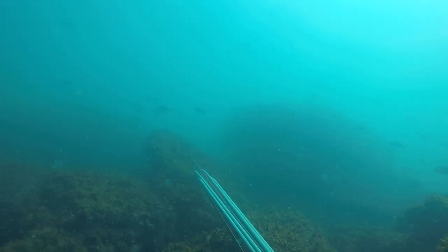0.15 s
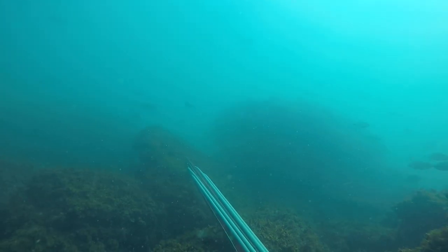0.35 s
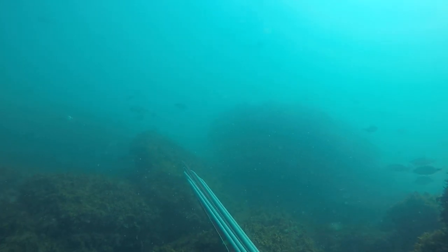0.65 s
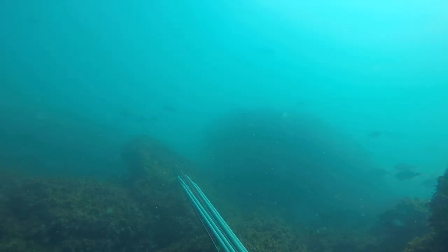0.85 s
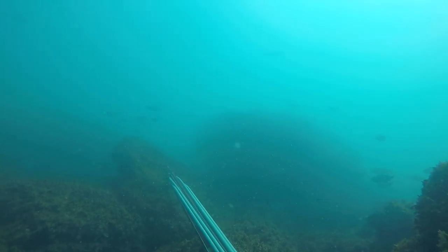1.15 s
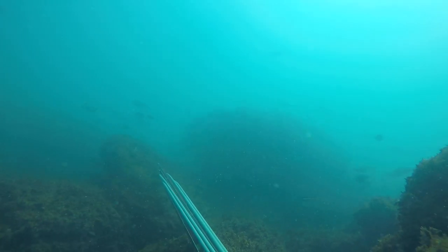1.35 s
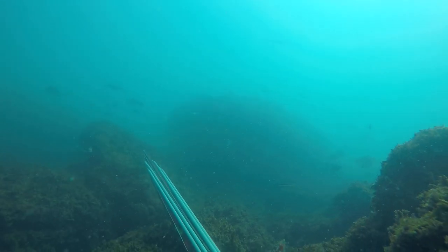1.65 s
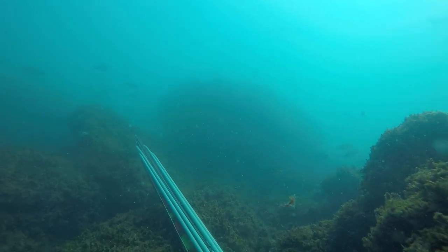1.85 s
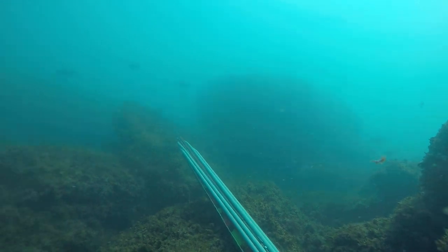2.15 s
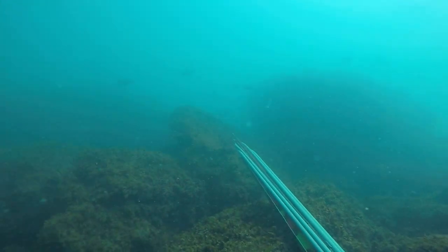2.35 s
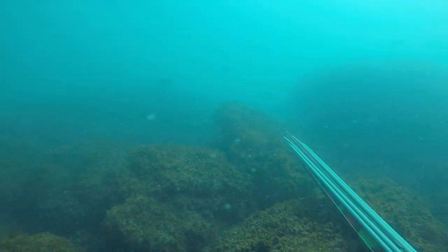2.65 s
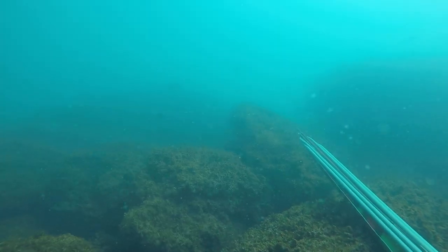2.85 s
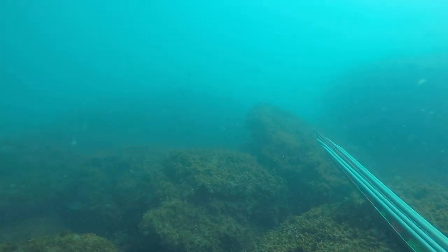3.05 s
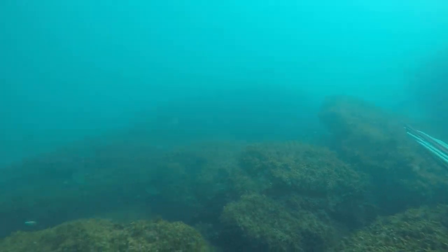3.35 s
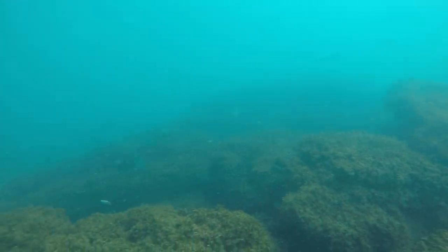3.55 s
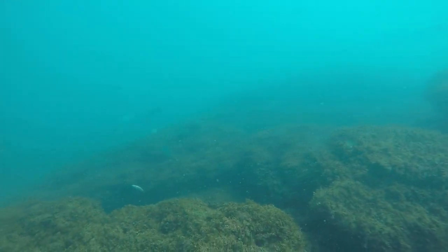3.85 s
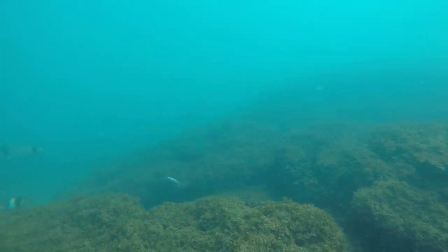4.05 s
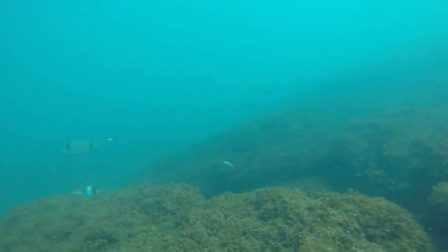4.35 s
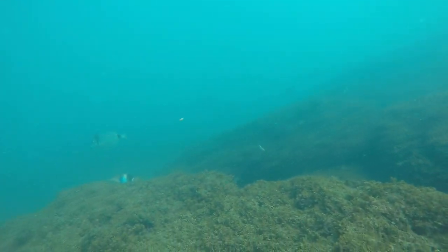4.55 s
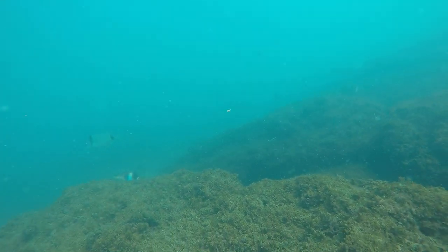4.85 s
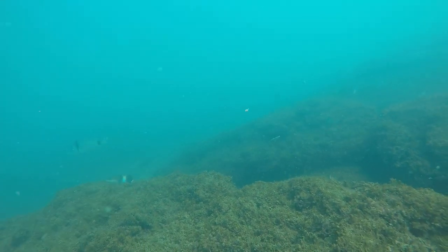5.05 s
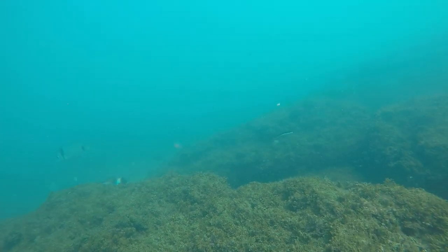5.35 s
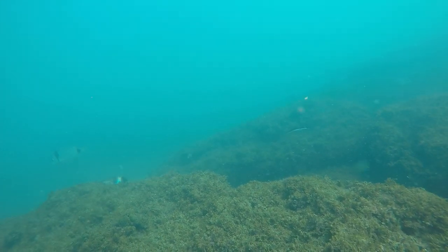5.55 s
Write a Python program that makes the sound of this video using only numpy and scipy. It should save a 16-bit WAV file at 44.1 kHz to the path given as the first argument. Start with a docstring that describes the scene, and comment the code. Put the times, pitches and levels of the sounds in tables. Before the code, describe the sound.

Dense underwater crackling like frying, a few sharp loud snaps, and muffled bumps of a grip against an underwater camera casing.

```python
"""Snapping shrimp crackle all around a camera in a waterproof housing that glides over a rocky reef.
Each snap is a pressure pulse that rings the housing, returns inverted from the sea surface and scatters
off the rocks. Near claws are placed one by one; random clicks, pops, ticks and a fizz make up the colony.
The grip knocks on the housing as damped sines with a few noise scuffs.
Water flowing past rumbles, and the grip rustles faintly, both as coloured noise."""
import sys
import numpy as np
from scipy import signal
from scipy.fft import rfft, irfft, next_fast_len
from scipy.io import wavfile
from scipy.ndimage import map_coordinates

SR = 44100
rng = np.random.default_rng(int(sys.argv[2]) if len(sys.argv) > 2 else 0)


def store_pcm(level_fs):
    """Save levels as 16-bit WAV."""
    pcm = np.round(np.clip(level_fs, -1, 1) * 32767).astype(np.int16)
    wavfile.write(sys.argv[1], SR, np.atleast_2d(pcm).T)


N = 251811
SNAP_SAMPLES, SWELL_SAMPLES = 4096, 128


def amp(db):
    """Decibels to gain."""
    return 10 ** (np.asarray(db) / 20)


def unit(x):
    """Scale to rms 1."""
    return x / np.sqrt(np.mean(x ** 2) + 1e-20)


def along(points, hz):
    """Read (frequency, value) points on a log-frequency axis."""
    point_hz, value = np.transpose(points)
    return np.interp(np.log(hz + 1), np.log(point_hz + 1), value)


def curves(rows):
    """One value per sample for each column after the time."""
    time_s, *columns = np.transpose(rows)
    t = np.arange(N) / SR
    return [np.interp(t, time_s, column) for column in columns]


def wobble(knots_per_s):
    """Smooth random curve: a spline through normal random knots."""
    knots = rng.standard_normal(int(N * knots_per_s / SR) + 4)
    return map_coordinates(knots, [np.arange(N) * knots_per_s / SR])


def filtered(x, response):
    """Zero-phase filter: the spectrum of x times a gain of frequency."""
    size = next_fast_len(N + SR // 2)
    gain = response(np.fft.rfftfreq(size, 1 / SR))
    return irfft(rfft(x, size) * gain, size)[:N]


def noise(spectrum):
    """Coloured noise of rms 1."""
    white = rng.standard_normal(N)
    return unit(filtered(white, lambda hz: amp(along(spectrum, hz))))


def add(track, time_s, sound):
    """Mix a sound into the track."""
    start = int(np.clip(round(time_s * SR), 0, N))
    track[start:start + len(sound)] += sound[:N - start]


# wall resonances and the cancellations between them: (frequency [Hz], half width [Hz], gain [dB])
WALL_MODES = [(975, 210, 2), (1188, 24, -5.5), (2220, 360, 1.5), (3010, 62, -7), (3420, 370, 1),
              (4150, 77, -3.5), (4340, 710, 4.5), (9030, 1100, 3.5), (10810, 140, -8.5)]


def ring(spectrum, focus_hz=3000, focus_db=0, peak_db=0, treble_db=0, wall=1, focus_octaves=0.58,
         peak_octaves=0.093, bending_s=0.001207):
    """Causal answer of the housing to one pressure pulse, chirped by bending waves; energy 1."""
    hz = np.fft.rfftfreq(SNAP_SAMPLES, 1 / SR) + 1
    db = along(spectrum, hz)
    db += wall * sum(gain / (1 + ((hz - mode_hz) / width) ** 2) for mode_hz, width, gain in WALL_MODES)
    octaves = np.log2(hz / focus_hz)
    db += focus_db / (1 + (octaves / focus_octaves) ** 2)
    db += peak_db / (1 + (octaves / peak_octaves) ** 2)
    db += treble_db / (1 + (6500 / hz) ** 6)  # shelf above 6.5 kHz
    # folded cepstrum: minimum phase
    cepstrum = irfft(np.log(np.maximum(amp(db), 1e-6)))
    cepstrum[1:SNAP_SAMPLES // 2] *= 2
    cepstrum[SNAP_SAMPLES // 2 + 1:] = 0
    # bending waves are slower at low pitch: delay = bending_s * (sqrt(1000 / hz) - 0.2)
    phase_lag = 4 * np.pi * bending_s * (np.sqrt(1000 * hz) - hz / 10)
    pulse = irfft(np.exp(rfft(cepstrum) - 1j * phase_lag))
    return pulse / np.linalg.norm(pulse)


def snap(colour, echo_db, scatter_db, crevice_db=-5, crevice_t60_s=0.0085, surface_s=0.0059,
         scatter_t60_s=0.1, swell_db=-15):
    """Short faint noise swell, then a bubble collapse: direct, off crevice and reef, inverted off surface."""
    t = np.arange(SNAP_SAMPLES) / SR
    crevice = rng.standard_normal(SNAP_SAMPLES) * amp(-60 * t / crevice_t60_s)
    reef = rng.standard_normal(SNAP_SAMPLES) * amp(-60 * t / scatter_t60_s)
    paths = amp(crevice_db) * crevice / np.linalg.norm(crevice)
    paths += amp(scatter_db) * reef / np.linalg.norm(reef)
    paths[0] = 1  # direct
    echo_s = surface_s * np.exp(0.07 * rng.standard_normal())
    paths[int(echo_s * SR)] -= amp(echo_db)
    # noise swells for 128 samples up to the snap
    swell = rng.standard_normal(SWELL_SAMPLES) * np.linspace(0, 1, SWELL_SAMPLES) ** 2
    swell *= amp(swell_db + crevice_db) / np.linalg.norm(swell)
    sound = signal.fftconvolve(colour, np.concatenate([swell, paths]))[:SNAP_SAMPLES]
    return sound / np.linalg.norm(sound)


# loudest claws: (time of collapse [s], level [dB], focus pitch [Hz], treble shelf [dB])
NEAR_SNAPS = [(0.1344, -31.5, 3470, -33), (0.2065, -31.5, 1750, 6), (.287, -33, 4220, 8),
              (0.3937, -34, 1430, -4), (0.489, -32.5, 2900, -20), (0.5585, -33.5, 9100, -0.5),
              (0.606, -35, 3240, -10), (0.755, -35.5, 1300, 19), (0.7854, -30.5, 1370, -3),
              (0.8976, -30.5, 3330, 6), (1.0218, -37.5, 2640, -10), (1.163, -32, 1460, -2),
              (1.169, -30.5, 1680, 8), (1.3562, -33, 1130, 1), (1.3809, -33.5, 9100, 2.5),
              (1.5924, -20, 2320, -2.5), (1.767, -38, 2600, -13), (1.788, -34, 5430, 11),
              (1.831, -27, 2270, 11), (1.9682, -35, 1880, 7), (2.021, -32, 1350, 3),
              (2.1189, -34.5, 2850, -33), (2.195, -37, 2760, 6), (2.2125, -37, 5930, -1),
              (2.2225, -35.5, 3330, 17), (2.2368, -34.5, 3330, 4), (2.2961, -34, 1530, 1),
              (2.3335, -42.5, 5800, -10), (2.367, -28.5, 4160, 12.5), (2.4395, -36, 1140, -1),
              (2.5683, -35.5, 6060, -15), (2.6643, -28.5, 5400, 13.5), (2.7319, -36, 4190, -1),
              (2.7841, -31.5, 1750, -34), (2.841, -37.5, 3130, 9), (2.865, -39.5, 5470, 16),
              (3.0686, -34.5, 4440, -27), (3.18, -38.5, 9200, 5), (3.2467, -34, 2310, -21),
              (3.2717, -34.5, 2570, -5), (3.428, -36, 2770, -8), (3.4338, -36, 2400, 1),
              (3.4563, -18, 2250, -4), (3.6087, -36.5, 4700, 12), (3.6487, -36, 9300, -9),
              (3.7697, -33, 1930, 7), (3.8519, -32, 2880, 4), (3.8635, -32.5, 2960, 14),
              (3.964, -36.5, 5000, 2), (4.0137, -34, 6600, 11), (4.07, -35, 3100, -13),
              (4.2336, -38, 2940, -1), (4.4015, -31.5, 3470, 25), (4.4067, -28.5, 1900, 13),
              (4.535, -31.5, 5000, 2), (4.7178, -35, 1420, 6), (4.78, -32, 1540, -2),
              (4.984, -30.5, 1530, -12), (4.989, -33, 3030, 12.5), (4.998, -37, 9100, 2),
              (5.1106, -34.5, 2580, 4), (5.1194, -34, 1290, 5), (5.193, -39, 1810, -10),
              (5.3305, -22.5, 2010, -14), (5.5857, -32, 2320, -28), (5.6135, -32, 3440, 4.5)]
# housing transmission: (frequency [Hz], relative level [dB])
HOUSING = [(280, -45), (480, -24), (713, -16.5), (971, -5.5), (1120, -10), (1490, 0), (3380, 0), (4150, -6),
           (5650, -6), (9720, -24), (10800, -23), (13000, -20.5), (16000, -31)]
LEVEL_WINDOW_S = 0.004  # a snap's energy equals its level as rms over this time
TYPICAL_DB, BESIDE_DB = -34.5, -24  # typical near snap; above the second, right beside the housing
ECHO_DB, SCATTER_DB, CREVICE_DB = -8.5, -5.5, -2  # reflections of a typical near snap
ECHO_FALL = 0.38  # echo dB lost per dB of closeness; scatter and crevice lose 1


def near_shrimp():
    """Single claws: the louder and closer, the drier; those right beside the housing ring the wall more."""
    track = np.zeros(N)
    for time_s, level_db, focus_hz, treble_db in NEAR_SNAPS:
        closeness_db = level_db - TYPICAL_DB
        beside = level_db > BESIDE_DB
        # a big bubble beside the housing drives the wall modes
        focus_db, wall = (5, 4.5) if beside else (9, 1)
        colour = ring(HOUSING, focus_hz, focus_db, peak_db=4.5, treble_db=treble_db, wall=wall)
        sound = snap(colour, echo_db=ECHO_DB - ECHO_FALL * closeness_db,
                     scatter_db=SCATTER_DB - closeness_db, crevice_db=CREVICE_DB - closeness_db)
        gain = amp(level_db) * np.sqrt(LEVEL_WINDOW_S * SR)
        add(track, time_s - SWELL_SAMPLES / SR, gain * sound)
    return track


def crackle(snaps_per_s, spread_db, cap_db, focus_hz, treble_db, crevice_db, scatter_db, flurry_db,
            patches=40):
    """Shrimp on patches of reef, one random colour per patch, snapping in loose flurries; rms 1."""
    track = np.zeros(N)
    flurry = amp(flurry_db * wobble(45))
    clock = np.cumsum(flurry) / flurry.sum()
    snaps_per_patch = int(snaps_per_s * N / SR / patches)
    for _ in range(patches):
        pitch, treble = rng.standard_normal(2)
        colour = ring(HOUSING, focus_hz * np.exp(0.45 * pitch), focus_db=13, peak_db=3.5,
                      treble_db=treble_db + 6.4 * treble)
        sound = snap(colour, echo_db=-12, scatter_db=scatter_db, crevice_db=crevice_db, scatter_t60_s=0.044)
        for when, rarity in rng.random((snaps_per_patch, 2)):
            # exponential levels: faint far snaps outnumber loud close ones
            level_db = min(-spread_db * np.log(rarity), cap_db)
            add(track, np.searchsorted(clock, when) / SR, amp(level_db) * sound)
    return unit(track)


# common gain on the layer mix: (time [s], gain [dB])
COLONY = [(0.0, -49), (0.4, -46.5), (0.49, -48.5), (1.22, -49), (2.13, -50.5), (2.42, -47.5), (2.96, -49.5),
          (3.36, -47.5), (3.61, -51), (3.94, -45.5), (4.2, -49.5), (4.52, -48), (5.06, -48), (5.71, -47.5)]
# far snaps: (frequency [Hz], relative level [dB])
FIZZ = [(260, -34.5), (450, -15), (664, -14), (993, -9.5), (1170, -7.5), (1490, 1), (2290, -5), (3000, 2),
        (3330, -1), (4110, -5.5), (5540, -4), (10700, -16.5), (13200, -13), (15300, -16), (16000, -44)]


def colony():
    """Rest of the reef: crisp nearby clicks, dull crevice pops, thin ticks and a flickering noise fizz."""
    gain_db, = curves(COLONY)
    clicks = crackle(snaps_per_s=15, spread_db=14, cap_db=5.5, focus_hz=3290, treble_db=4,
                     crevice_db=-2.5, scatter_db=-4, flurry_db=0.83, patches=28)
    pops = crackle(snaps_per_s=210, spread_db=7.5, cap_db=15.5, focus_hz=2610, treble_db=-1,
                   crevice_db=6, scatter_db=2, flurry_db=2.5)
    ticks = crackle(snaps_per_s=190, spread_db=4, cap_db=16, focus_hz=6100, treble_db=5,
                    crevice_db=-17, scatter_db=-19, flurry_db=1)
    flicker_db = 1.0 * wobble(90) + 2.85 * wobble(400)
    far = rng.standard_normal(N) * amp(flicker_db)
    fizz = unit(signal.oaconvolve(far, ring(FIZZ))[:N])
    mix = amp(-5.5) * clicks + amp(-2) * pops + amp(-8) * ticks + amp(-5.5) * fizz
    return amp(gain_db) * mix


# grip bumps: (time [s], first-mode envelope peak [dB], pitch [Hz], time to the peak [cycles])
KNOCKS = [(0.063, -26.5, 40.4, 0.87), (.072, -31.5, 116, 0.73), (.138, -33, 190, 0.39),
          (.169, -33, 180, 0.51), (.185, -30.5, 126, .65), (.213, -28, 142, 0.5), (0.314, -46.5, 160, 0.44),
          (0.55, -31.5, 30.2, 0.46), (.564, -43, 180, 0.22), (.632, -15.5, 83, 0.78),
          (.653, -11.5, 175, 0.94), (.679, -21.5, 188, 0.89), (0.696, -26, 106, 0.4), (.73, -46, 280, 0.49),
          (1.161, -28.5, 129, 0.18), (2.105, -37, 154, 1.1), (2.131, -27.5, 224, 0.98),
          (2.142, -25, 85, .5), (2.182, -38, 110, 0.45), (2.238, -31, 65, .44), (3.578, -44.5, 167, 0.71),
          (4.375, -34.5, 206, 0.42), (4.584, -40, 184, 0.59), (4.758, -45, 169, 0.93)]
# grip slips on the plastic: (time [s], level before the soft onset [dB], t60 [s])
SCUFFS = [(.632, -32, 0.037), (0.651, -41, .05), (.68, -51, .048), (2.133, -44, .067)]
# scuff noise: (frequency [Hz], relative level [dB])
SCUFF_COLOUR = [(120, -27), (400, -9), (600, -14), (820, -14), (1130, 3.5), (1500, -28), (4000, -25.5)]
UPPER_RATIO, UPPER_DB, UPPER_CYCLES = 1.88, -17, 1.6  # second mode re first: pitch, level, cycles


def knocks():
    """Bumps of the grip as two water-damped modes each; some also scuff the plastic."""
    bumps, slips = np.zeros((2, N))
    t = np.arange(SR // 4) / SR
    for time_s, peak_db, hz, cycles in KNOCKS:
        modes = [(hz, peak_db, cycles), (hz * UPPER_RATIO, peak_db + UPPER_DB, cycles * UPPER_CYCLES)]
        for mode_hz, mode_db, mode_cycles in modes:
            rise = t * mode_hz / mode_cycles
            envelope = rise ** 2 * np.exp(2 * (1 - rise))  # peaks at 1
            add(bumps, time_s, amp(mode_db) * envelope * np.sin(2 * np.pi * mode_hz * t))
    for time_s, level_db, t60_s in SCUFFS:
        onset = 1 - np.exp(-t / 0.0035)
        add(slips, time_s, amp(level_db - 60 * t / t60_s) * onset)
    return bumps + slips * noise(SCUFF_COLOUR)


# before the trims: (time [s], flow level [dB], grip rustle level [dB])
FLOW = [(0.0, -46.5, -65), (0.37, -52.5, -64.5), (0.65, -45.5, -64), (1.02, -55, -66.5), (1.38, -55, -67.5),
        (1.64, -52.5, -67.5), (2.27, -51.5, -60.5), (2.4, -51.5, -61.5), (2.65, -54.5, -64),
        (3.02, -50.5, -66.5), (3.37, -51, -59.5), (3.75, -55.5, -65), (4.07, -57, -63.5),
        (4.61, -50, -64.5), (5.31, -57.5, -68), (5.71, -56, -69.5)]
# flow and grip noise: (frequency [Hz], relative level [dB])
RUMBLE = [(8.8, -14), (15, 4.5), (37, -2), (46, -7.5), (65, -10.5), (130, -32.5), (160, -34), (210, -69),
          (350, -120)]
RUSTLE = [(53, -36), (90, 1.5), (130, -1.5), (201, -6), (333, -11.5), (502, -18), (800, -23.5), (1040, -51),
          (1760, -120)]
FLOW_TRIM_DB, RUSTLE_TRIM_DB = 5.5, 2


def flow():
    """Eddies press on the housing as low noise; the grip rustles faintly."""
    flow_db, rustle_db = curves(FLOW)
    rumble = amp(flow_db + FLOW_TRIM_DB) * noise(RUMBLE)
    rustle = amp(rustle_db + RUSTLE_TRIM_DB) * noise(RUSTLE)
    return rumble + rustle


def scene():
    """Everything reaches one microphone inside the housing."""
    return (near_shrimp() + colony() + knocks() + flow())[None]


def record(dry):
    """Camera band limit: very steep zero-phase low-pass, -3 dB at top_hz."""
    top_hz = 15700
    return np.array([filtered(channel, lambda hz: 1 / np.sqrt(1 + (hz / top_hz) ** 160)) for channel in dry])


dry = scene()
out = record(dry)
store_pcm(out)
```